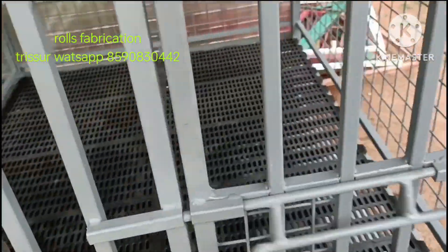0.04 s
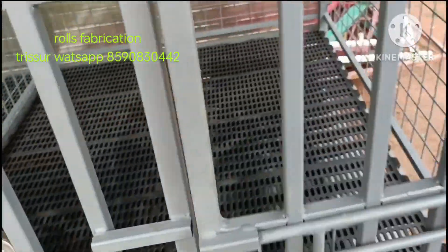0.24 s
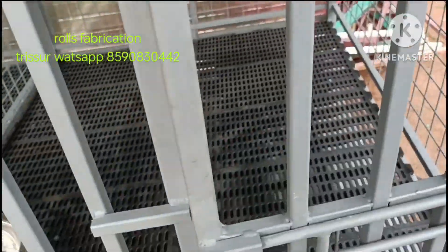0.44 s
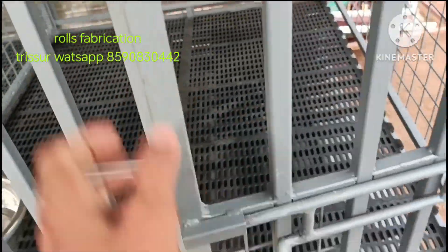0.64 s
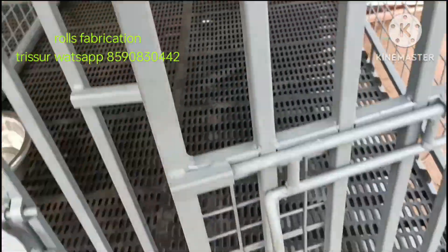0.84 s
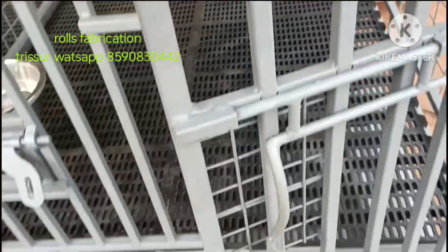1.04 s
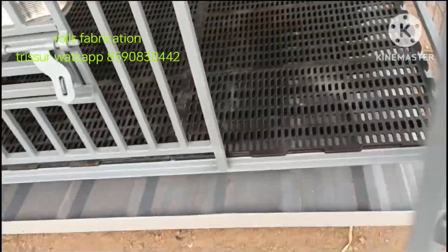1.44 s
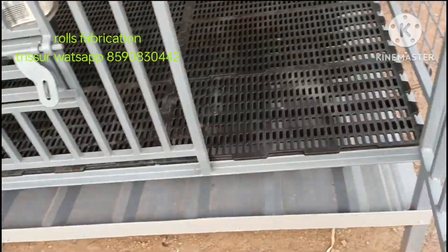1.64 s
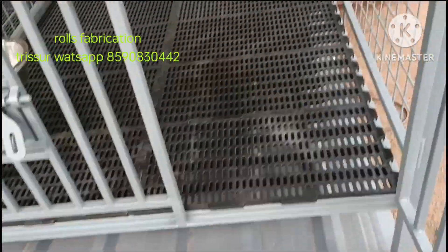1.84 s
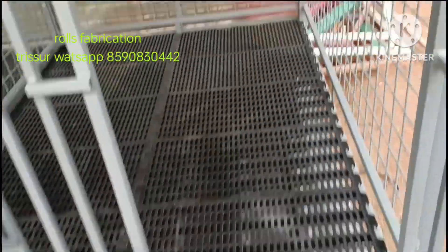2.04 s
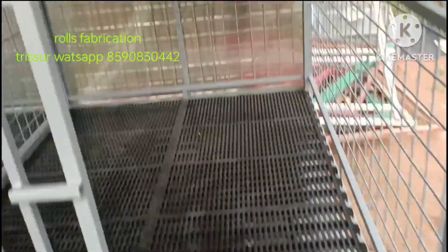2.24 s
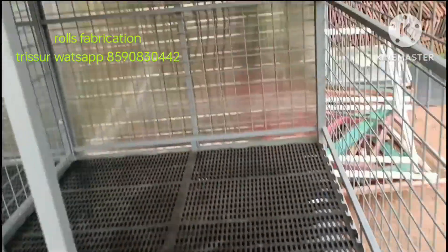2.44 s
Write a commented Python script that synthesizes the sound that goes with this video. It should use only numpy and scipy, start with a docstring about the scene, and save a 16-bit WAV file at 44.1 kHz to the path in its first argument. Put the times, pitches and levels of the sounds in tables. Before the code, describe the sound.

Two ringing clacks from a steel cage gate latch, followed by hinge scrapes and a knock.

```python
"""Outdoors at a welded steel cage gate, microphone close, as the gate is unlatched and swung open.
The bolt slides and clacks twice; bars and mesh ring, the lows blooming late. The dry hinge scrapes
and whistles, the latch handle drops, a faint tone sinks, and the frame takes a last knock as the gate
swings wide. Quiet air lies underneath, and a limiter flattens the loudest blows."""
import sys
import numpy as np
from scipy import signal
from scipy.fft import rfft, irfft
from scipy.io import wavfile
from scipy.ndimage import uniform_filter1d, minimum_filter1d

SR = 44100
rng = np.random.default_rng(int(sys.argv[2]) if len(sys.argv) > 2 else 0)


def output_pcm(signal):
    """Save a mono or channel-first signal as 16-bit PCM at the path in sys.argv[1].

    Samples are clipped to [-1, 1] before scaling.
    """
    pcm = np.clip(np.atleast_2d(signal).T, -1, 1) * 32767
    wavfile.write(sys.argv[1], SR, np.round(pcm).astype(np.int16))


N = 110250  # 2.5 s
TOP_HZ = 14700
BANDS_HZ = 28 * 2 ** (np.arange(19) / 2)  # half-octave centres

# Spectrum of the ringing cage: band_hz, level_db
CAGE_SPECTRUM = [(55, -33.5), (80, -45.5), (112, -17), (220, -16.5), (380, -3.5), (560, -7), (850, -8),
                 (1300, -6), (2500, -6), (4500, -5), (6500, -3), (9500, 5.5), (13000, -14.5)]
# Centres of the five colour bands of a contact (bass, low middle, middle, presence, treble): band_hz
COLOUR_HZ = [200, 500, 1400, 3800, 9000]


def undb(db):
    """Decibels to gain."""
    return 10 ** (np.asarray(db) / 20)


def at(table, hz):
    """Read (Hz, value) points on a log-frequency axis."""
    points_hz, values = np.array(table, float).T
    return np.interp(np.log(hz), np.log(points_hz), values)


def unit(x):
    """Scale to rms 1."""
    return x / (x.std() + 1e-12)


def wander(span):
    """Noise smoothed over span samples, at rms 1."""
    return unit(uniform_filter1d(rng.standard_normal(N), span))


def band(spectrum, hz):
    """Half an octave of a spectrum as a signal of rms 1."""
    part = np.zeros_like(spectrum)
    bins = np.arange(int(hz / 2 ** .5 * N / SR), int(hz * 2 ** .5 * N / SR))
    octaves_off = abs(np.log2(bins * SR / N / hz))
    part[bins] = spectrum[bins] * np.sqrt(np.maximum(1 - 2 * octaves_off, 0))
    return unit(irfft(part, N))


def stroke(start_s, length_s, rise_s=.012, fall_s=.016):
    """Rise, hold and fall of one rubbing contact."""
    t = np.arange(N) / SR - start_s
    return np.clip(t / rise_s, 0, 1) * np.exp(-np.maximum(t - length_s, 0) / fall_s)


def outdoor_air():
    """Quiet outdoor background, each band flickering on its own."""
    # Background spectrum: band_hz, level_db
    air_spectrum = [(30, -76.5), (55, -71), (120, -77), (300, -68.5), (600, -70.5), (1300, -73),
                    (3000, -70.5), (6000, -81), (9500, -70), (13000, -89.5)]
    flicker_db = 5.5
    noise = rfft(rng.standard_normal(N))
    return sum(band(noise, hz) * undb(at(air_spectrum, hz) + flicker_db * wander(5000))
               for hz in BANDS_HZ)


def cage_modes(gap_hz=6, gap_share=.0035, scatter_db=3):
    """Line spectrum of the many lesser modes of bars and mesh, wider apart as the pitch rises."""
    lines, hz = np.zeros(N // 2 + 1), 40.
    for step, size in rng.standard_normal((2000, 2)):
        hz += (gap_hz + gap_share * hz) * np.exp(step / 2)
        if hz < TOP_HZ:
            lines[int(hz * N / SR)] = undb(scatter_db * min(size, 1.5))
    return lines


def mode_envelope(hz, t60, rise_s, chatter_s, time_scale):
    """A mode blooms, holds while the parts chatter, then dies; time_scale shortens bloom and decay."""
    # Time for the ring to spread through the cage, before time_scale: band_hz, bloom_s
    bloom_times = [(110, 0.11), (300, 0.011), (600, 0.028), (1500, .004), (4000, 0.0017), (10000, 0.00062)]
    t = np.arange(N) / SR
    bloom_s = time_scale * at(bloom_times, hz)
    attack = 1 - np.exp(-np.minimum((t / (rise_s + bloom_s)) ** 2, 20))
    fall = np.log(1000) * np.maximum(t - chatter_s - bloom_s, 0) / (time_scale * t60)
    return attack * np.exp(-np.minimum(fall, 20))


def shudder(depth_db=3, span_s=.03):
    """Loose panels make the low ring swell and dip unevenly."""
    span = int(span_s * SR)
    sway = unit(uniform_filter1d(wander(span), span // 2))
    return undb(depth_db * sway - depth_db / 3)


def cage_ring(lines, colour, rise_s, chatter_s, time_scale):
    """The lesser modes after one contact; each contact point favours other modes, and a few ring on."""
    # Decay of the cage, before time_scale: band_hz, t60_s
    ring_times = [(110, 2.42), (350, 1.775), (600, 1.136), (1200, 0.64), (2500, 0.44), (5000, 0.25),
                  (8000, 0.2), (13000, 0.11)]
    scatter_db, tail_share, tail_db, tail_stretch = 3.5, .15, -29.5, 2.8
    phases = np.exp(2j * np.pi * rng.random(len(lines)))
    struck = lines * phases * undb(scatter_db * rng.uniform(-1, 1, len(lines)))
    lasting = struck * np.where(rng.random(len(lines)) < tail_share, 1, .05)
    tint, out = list(zip(COLOUR_HZ, colour)), 0
    for hz in BANDS_HZ[2:]:
        t60 = at(ring_times, hz)
        sound = band(struck, hz) * mode_envelope(hz, t60, rise_s, chatter_s, time_scale)
        if hz > 800:  # faint long ring of the mesh wires
            tail = mode_envelope(hz, tail_stretch * t60, rise_s, chatter_s, time_scale)
            sound += undb(tail_db) * band(lasting, hz) * tail
        else:
            sound *= shudder()
        out = out + sound * undb(at(CAGE_SPECTRUM, hz) + at(tint, hz))
    return out


def scrapes(lines, slips_per_s=900, scatter_db=3.5, tick_db=-3):
    """Steel slips on steel in dense uneven ticks; the hand damps the ring."""
    # Rubs of bolt and hinge: start_s, length_s, level_db, five colour_db
    rubs = [(-.02, 0.019, -61, 25, 1.5, 14.5, 13.5, -21), (0.068, 0.15, -40.5, 3, 1.5, 4.5, 0.5, -10),
            (0.155, 0.1, -44, -3.5, 15.5, -13, 3.5, -4.5), (0.848, 0.014, -67, -6.5, -9, -17.5, 20, -22.5),
            (0.902, 0.057, -62, 7.5, -7, 6, -8, 1.5), (1.199, 0.075, -59, 6.5, -31, 8.5, 4, -25),
            (1.278, 0.054, -43, -31, -22, 2.5, 0.5, -18.5),
            (1.348, 0.027, -42.5, -18.5, -22, 4.5, -3.5, -21), (1.445, 0.016, -62.5, -20, -16, 16, 6, -24),
            (1.527, 0.11, -41.5, -29.5, -11.5, 4, 6, -18),
            (1.616, 0.068, -44.5, -36.5, -7.5, 3.5, -0.5, -20),
            (1.686, 0.12, -54.5, 4.5, -42, 6.5, -3, -11.5), (1.827, 0.034, -51, 3, -5.5, 5, -9.5, -16),
            (2.03, 0.041, -62, -5.5, -23, -19.5, 5, -12)]
    # Resonances of the rubbing hinge: centre_hz, width_hz, gain_db
    hinge_peaks = [(900, 260, 4), (1300, 200, 1.5), (2950, 500, 3.5)]
    damped = rfft(cage_ring(lines, np.zeros(len(COLOUR_HZ)), 1 / SR, 0, time_scale=.2))
    response = sum(band(damped, hz) * undb(at(CAGE_SPECTRUM, hz)) for hz in BANDS_HZ[2:])
    response = response[:N // 2] / np.sqrt(N)
    response[0] += undb(tick_db)  # the bare tick of each slip
    hz, out = np.maximum(np.arange(N // 2 + 1), 1) * SR / N, 0
    peaks_db = sum(db / (1 + (2 * (hz - centre) / width) ** 2) for centre, width, db in hinge_peaks)
    for start_s, length_s, level_db, *colour in rubs:
        slips = (rng.random(N) < slips_per_s / SR) * rng.choice([-1, 1], N)
        slips = unit(slips * undb(scatter_db * np.clip(rng.standard_normal(N), -2, 2)))
        rub = signal.fftconvolve(slips * stroke(start_s, length_s), response)[:N]
        tint = list(zip(COLOUR_HZ, colour))
        out = out + irfft(rfft(rub) * undb(level_db + peaks_db + at(tint, hz)), N)
    return out


def clacks(lines, blows, modes, crack_s=.003, beat_hz=8.6, beat_depth=.29):
    """Steel strikes steel: a short crack, the struck part's strong modes and the ring of the cage."""
    t, out = np.arange(N) / SR, np.zeros(N)
    crack_band = signal.butter(2, [1500, 11000], "band", fs=SR, output="sos")
    for start_s, level_db, crack_db, rise_s, chatter_s, *colour in blows:
        tint = list(zip(COLOUR_HZ, colour))
        crack = unit(signal.sosfilt(crack_band, rng.standard_normal(N)))
        crack = irfft(rfft(crack) * undb(at(tint, np.linspace(1, SR / 2, N // 2 + 1))), N)
        hit = cage_ring(lines, colour, rise_s, chatter_s, time_scale=.88)
        hit += undb(crack_db) * crack * np.exp(-t / crack_s)
        for hz, mode_db, t60 in modes:  # each strong mode is a close pair that beats
            pair = np.sin(2 * np.pi * (hz * t + rng.random()))
            twin_hz = hz + beat_hz * (.5 + rng.random())
            pair += beat_depth * np.sin(2 * np.pi * (twin_hz * t + rng.random()))
            if hz < 1300:
                pair *= shudder()
            envelope = mode_envelope(hz, t60, rise_s, chatter_s, time_scale=.77)
            hit += np.sqrt(2) * pair * undb(mode_db + at(tint, hz)) * envelope
        onset = int(start_s * SR)
        out[onset:] += undb(level_db) * hit[:N - onset]
    return out


def bolt(lines):
    """The bolt strikes the gate: two hard clacks among lighter taps."""
    # Bolt on gate: start_s, level_db, crack_db, rise_s, chatter_s, five colour_db
    blows = [(.081, -38.5, 16.5, 0.00057, 0.0013, 6.5, 2, 1.5, -18, -7),
             (0.2116, -17.5, -4, 0.00067, .047, 2.5, 0.5, 5, 4, 3.5),
             (0.3944, -16.5, 20, .0005, 0.022, -11, -16.5, -1, 4.5, -1),
             (0.59, -44.5, -3, 0.0011, 0.0019, -9.5, -7.5, -17.5, 5, -20),
             (1.502, -54, 13.5, 0.00046, .002, -4, -22.5, 14.5, -3, -25.5),
             (1.529, -40.5, -1, 0.0004, 0.0044, -35, -20, 2.5, -3, -30)]
    # Strongest modes of the gate: pitch_hz, level_db, t60_s (before time_scale)
    gate_modes = [(107.34, -17, 2.45), (170.6, -14, 0.53), (264, -22.5, 1.4), (371, -9, 2.03),
                  (426.3, -10.5, 1.2), (535, -1.5, 1), (612, -6.5, 1.4), (1139, -19.5, 1.63),
                  (2266, -12, 0.33), (2535, -15, .7), (3100, -11, 0.59), (3464, -7, 0.19), (4080, -11, 0.2),
                  (4260, -15.5, 0.39), (4870, -11.5, 0.27), (5200, -18.5, 0.4)]
    return clacks(lines, blows, gate_modes)


def hinge_whistle(pitch_hz=8520, filter_width_hz=340):
    """Friction keeps one high resonance of the dry hinge whistling."""
    # Thin whistles: start_s, length_s, level_db
    whistles = [(.906, 0.035, -44), (0.964, 0.068, -61), (1.087, 0.075, -59), (1.147, 0.018, -39.5),
                (1.948, 0.066, -65)]
    b, a = signal.iirpeak(pitch_hz, pitch_hz / filter_width_hz, fs=SR)
    whistle = unit(signal.lfilter(b, a, signal.lfilter(b, a, rng.standard_normal(N))))
    return whistle * sum(undb(db) * stroke(start, length, rise_s=.013) for start, length, db in whistles)


def latch_handle(lines):
    """The small latch handle drops with a light tick."""
    # The drop: start_s, level_db, crack_db, rise_s, chatter_s, five colour_db
    ticks = [(1.154, -48, -1.5, 0.00075, 0.002, -13, -2.5, -1.5, -1.7, -4)]
    # Modes of the handle: pitch_hz, level_db, t60_s (before time_scale)
    handle_modes = [(1240, -10, 0.81), (2570, 2, 0.25), (2830, 9, 0.084), (5370, 5.5, 0.098),
                    (6250, 5.5, 0.11), (7160, 5.5, 0.14), (8350, -3, 0.07), (8610, 1, 0.056)]
    return clacks(lines, ticks, handle_modes)


def sinking_tone(waver=.0076):
    """A soft, slightly wavering tone sinks while the gate swings."""
    # Course of the tone: time_s, pitch_hz, level_db
    glide = [(1.68, 592, -77), (1.759, 586, -74), (1.82, 545, -48), (1.86, 527, -74), (1.94, 511, -56.5),
             (2.02, 495, -79)]
    time_s, pitch_hz, level_db = np.array(glide).T
    t = np.arange(N) / SR
    pitch = np.interp(t, time_s, pitch_hz) * (1 + waver * wander(400))
    tone = np.sqrt(2) * np.sin(2 * np.pi * np.cumsum(pitch) / SR)
    return tone * undb(np.interp(t, time_s, level_db)) * stroke(time_s[0], time_s[-1] - time_s[0])


def frame_knocks(lines):
    """The cage frame is knocked as the gate swings wide: one clack, then two soft bumps."""
    # Knocks on the frame: start_s, level_db, crack_db, rise_s, chatter_s, five colour_db
    knocks = [(2.174, -24.5, -6, 0.0074, 0.013, -6.5, 0.79, -4, -1, 0.5),
              (2.345, -50, -25, 0.0036, 0.0089, 17.5, 2.2, -14.5, -29, -44),
              (2.466, -40.5, -25, 0.002, 0.0081, -0.5, -0.15, 4.5, -5.5, -30.5)]
    # Strongest modes of the frame: pitch_hz, level_db, t60_s (before time_scale)
    frame_modes = [(270.2, -7.5, 1.5), (374.4, -6.5, 1.34), (376.5, -8.5, 7.8), (404, -20.5, 1.6),
                   (597, -9.5, 1.1), (633, -9, 0.9), (933, -12, 0.99), (1366, -6.5, 0.3), (1780, -5, 0.56),
                   (1873, -8, 0.56), (2150, -10, 0.57), (3960, -16.5, 0.17), (4460, -10, 0.21),
                   (5060, -11, 0.31), (5200, -11.5, 0.23)]
    return clacks(lines, knocks, frame_modes)


def scene():
    """All sources at one close microphone."""
    lines = cage_modes()
    blows = bolt(lines) + latch_handle(lines) + frame_knocks(lines)
    return (blows + scrapes(lines) + hinge_whistle() + sinking_tone() + outdoor_air())[None]


def record(dry):
    """The microphone colours the sound, a fast limiter holds the peaks, the top is cut."""
    # Microphone response: frequency_hz, gain_db
    mic_response = [(100, -5), (2450, -2.5), (2680, -2.5), (2900, -4), (5300, 0.5), (5800, -5.5),
                    (7500, -3.5), (8600, 1.5), (9800, 2.5), (10300, -4.5), (11200, -8), (12000, -12.5),
                    (13300, -9.5), (14700, -19)]
    limit_db, limit_s = -2.56, .003
    hz = np.maximum(np.arange(N + 1), 1) * SR / (2 * N)
    sound = irfft(rfft(dry, 2 * N) * undb(at(mic_response, hz)))[:, :N]
    span = int(limit_s * SR)
    overshoot = np.maximum(abs(sound) / undb(limit_db), 1)
    gain = uniform_filter1d(minimum_filter1d(1 / overshoot, span), span)
    top_cut = signal.ellip(8, .2, 70, TOP_HZ, fs=SR, output="sos")
    return signal.sosfilt(top_cut, sound * gain)


dry = scene()
out = record(dry)
output_pcm(out)
```